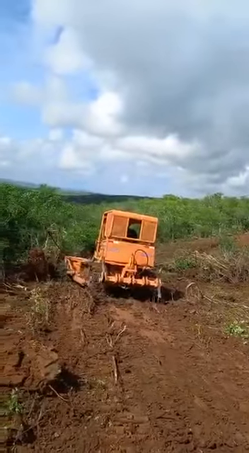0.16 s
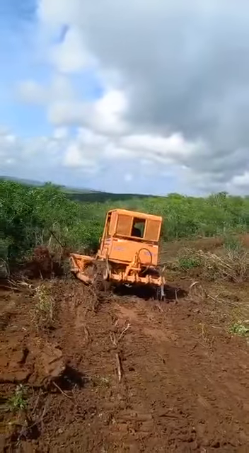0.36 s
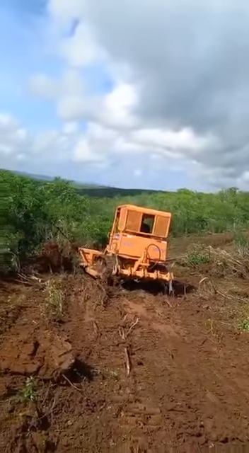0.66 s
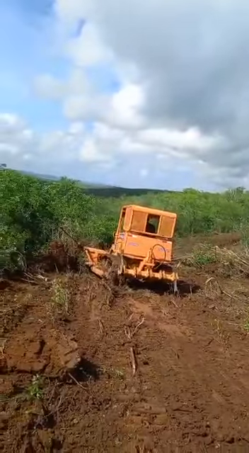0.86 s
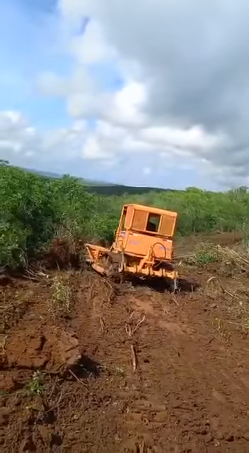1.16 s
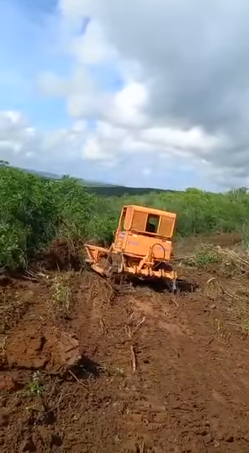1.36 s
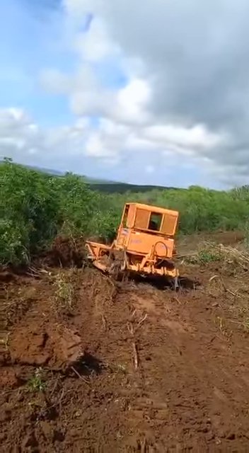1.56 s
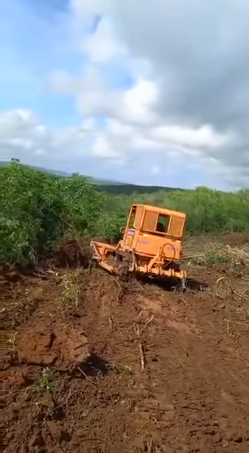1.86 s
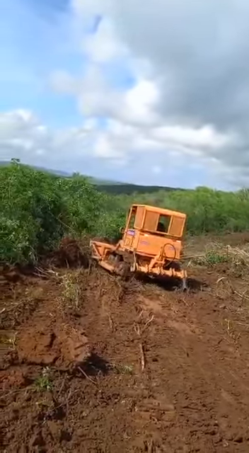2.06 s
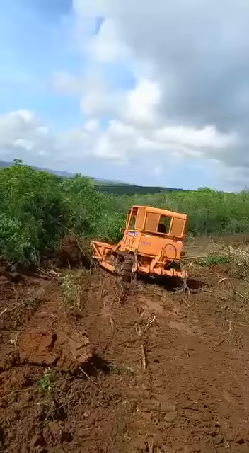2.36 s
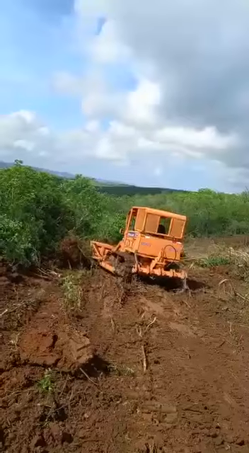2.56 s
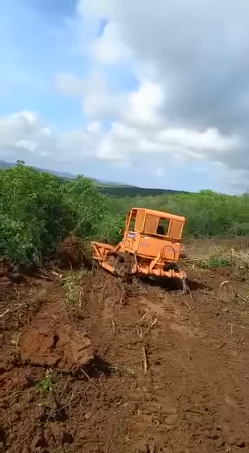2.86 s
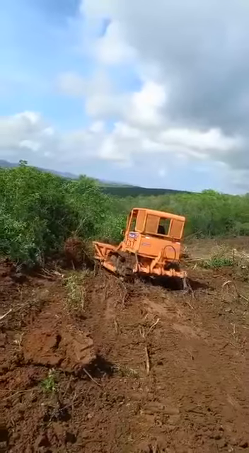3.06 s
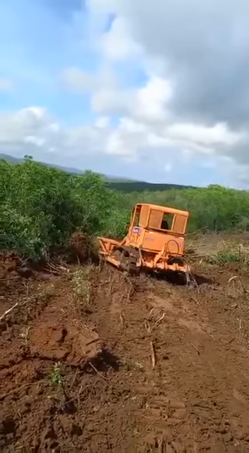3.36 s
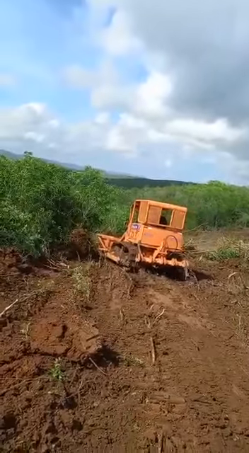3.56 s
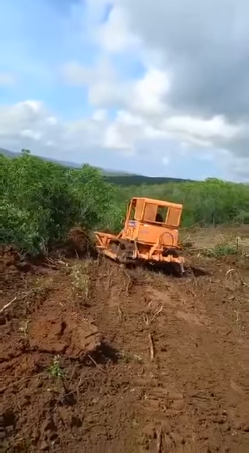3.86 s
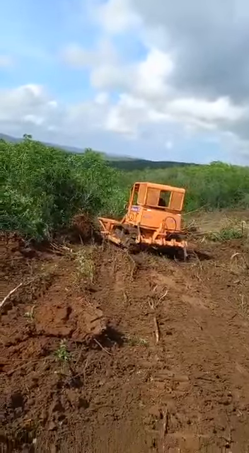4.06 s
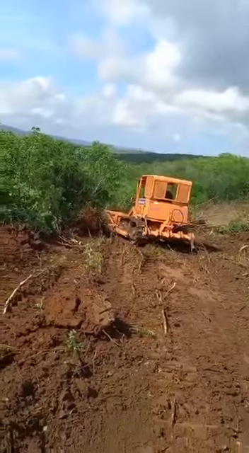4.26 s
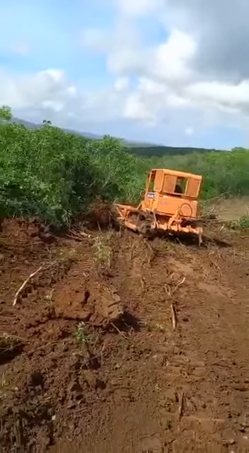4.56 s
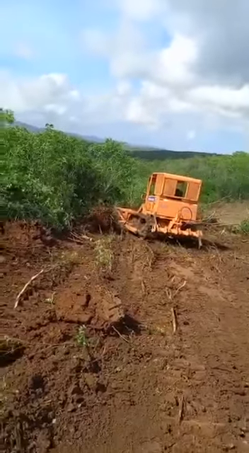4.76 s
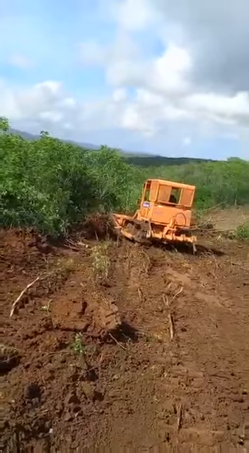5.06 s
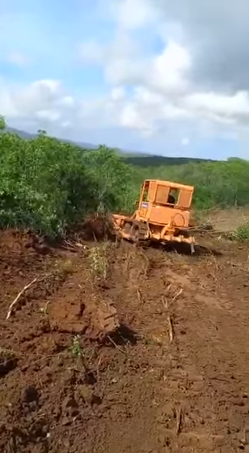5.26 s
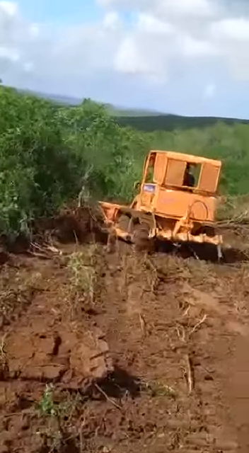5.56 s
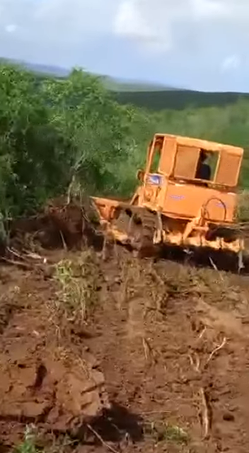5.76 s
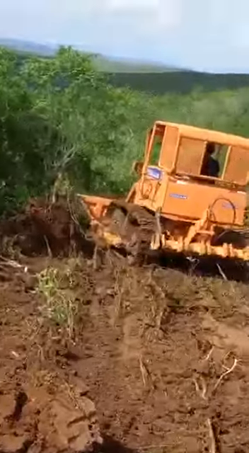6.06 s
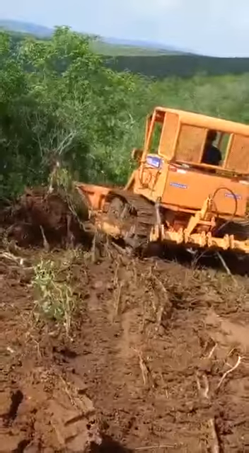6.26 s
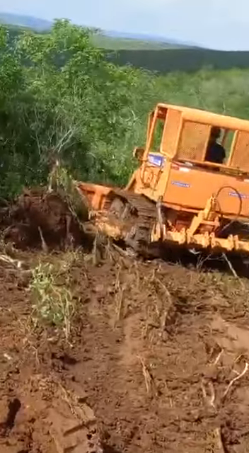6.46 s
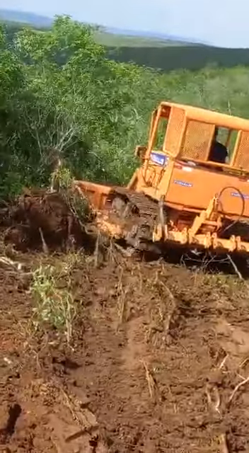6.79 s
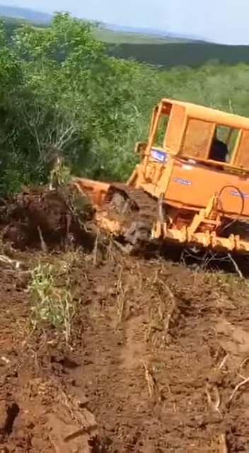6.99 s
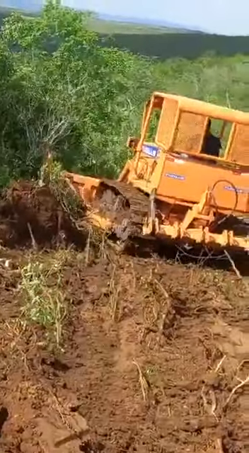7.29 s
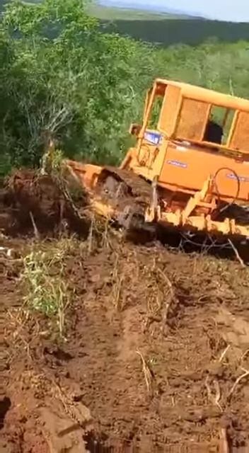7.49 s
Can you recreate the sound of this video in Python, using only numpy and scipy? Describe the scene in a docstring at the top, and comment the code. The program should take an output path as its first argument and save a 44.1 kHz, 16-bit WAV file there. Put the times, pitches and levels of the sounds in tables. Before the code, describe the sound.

Outdoors on open land, a six-cylinder diesel bulldozer runs continuously at a moderate distance. It first lugs, with deep exhaust drone, block knock, steel ticking, fine hiss, straining gear whine and dull churning earth. Around three seconds the load eases and the pitch rises slightly. Twigs snap near four seconds; a wind puff thumps the stereo handheld microphone just after five, followed by sharp cracks, panel buzz and faint stem crackle.

```python
"""A six-cylinder diesel crawler tractor pushes soil and brush across open land, heard at two microphone ports.
At first it lugs: exhaust orders drone over puffs of gas, the block clatters and knocks, thin steel ticks in a
fine hiss, gears whine under strain and earth churns off the blade. Near 3 s the load eases and the machine turns.
Near 4 s a light breeze freshens and twigs begin to snap; near 5.3 s a puff buffets the microphone, then on
rough ground panels buzz harder and crushed stems crackle, while bites of the blade still make the engine work."""
import sys
import numpy as np
from scipy import signal
from scipy.fft import rfft, irfft, next_fast_len
from scipy.io import wavfile
from scipy.ndimage import map_coordinates

SR = 44100
rng = np.random.default_rng(int(sys.argv[2]) if len(sys.argv) > 2 else 0)


def wav_out(sig):
    """Save sig, one row per channel (or a flat mono array), as 16-bit PCM at SR to the path in sys.argv[1]."""
    wavfile.write(sys.argv[1], SR, np.round(np.clip(np.atleast_2d(sig).T, -1, 1) * 32767).astype(np.int16))


N = 336483
TIME = np.arange(N) / SR
BINS = np.fft.rfftfreq(N, 1 / SR)  # Hz

# relative strength of each cylinder, one row a cylinder in firing order: knock_db, hiss_db
CYLINDERS = [(-7, -4.5), (-20, -10), (1, -3.5), (-7, -9), (-0.5, 0.5), (1, -4.5)]
CYLINDER_COUNT = len(CYLINDERS)
REFERENCE_HZ = 81.26  # reference firing rate, firings a second; the speed's shortfall below it measures the load
BITE_ATTACK_S, BITE_RELEASE_S = 0.075, 0.16  # softness of each edge
LURCHING = (5.4, 0.078)  # middle s, softness s: rough ground starts to shake the machine


def gain_of(db):
    """Level: decibels become an amplitude factor."""
    return 10 ** (np.asarray(db) / 20)


def evened(x):
    """Normalisation: scales to rms 1."""
    return x / np.sqrt(np.mean(x ** 2) + 1e-20)


def read(points, order=1):
    """Spectral envelope: one column of a frequency table, interpolated in log frequency at every bin."""
    table = np.transpose(points)
    return np.interp(np.log(BINS + 1), np.log(table[0] + 1), table[order])


def filtered(x, gain):
    """Linear filtering: multiplies the spectrum by a gain given at every bin."""
    size = next_fast_len(N, True)
    response = np.interp(np.fft.rfftfreq(size, 1 / SR), BINS, gain)
    return irfft(rfft(x, size) * response, size)[..., :N]


def drift(rate_hz):
    """Random modulation: chance values joined by straight lines, two per period of the rate, at rms 1."""
    steps = rng.standard_normal(4000)
    return evened(np.interp(TIME * rate_hz * 2, np.arange(len(steps)), steps))


def ramp(middle_s, softness_s):
    """Envelope: a smooth step from 0 to 1."""
    return .5 + .5 * np.tanh((TIME - middle_s) / (2 * softness_s))


def span(start_s, end_s, attack_s, release_s):
    """Envelope: rises softly at the start and falls softly at the end."""
    return ramp(start_s, attack_s) * (1 - ramp(end_s, release_s))


def crossfaded(before, after, share):
    """Linear mixing: goes from one value or sound to another as the share runs from 0 to 1."""
    return (1 - share) * before + share * after


def blend(lugging, free, ease):
    """Power addition: fades between two unrelated sounds at equal power."""
    return np.sqrt(1 - ease) * lugging + np.sqrt(ease) * free


def level(part, ease, bite):
    """Load dependence: dB between lugging and running free, plus a share of the dB for a full bite."""
    lugging_db, free_db, bite_db = part
    return crossfaded(lugging_db, free_db, ease) + bite_db * bite


def ringing(hz, width_hz):
    """Resonance: noise held in one narrow band."""
    return evened(filtered(rng.standard_normal(N), 1 / (1 + ((BINS - hz) / width_hz) ** 2)))


def port_noise(colour, order=1, source=None):
    """Coherence: mid and side noises mix so the ports agree in the bass and less in the treble."""
    # correlation of the two ports: frequency_hz, lugging_likeness, free_likeness
    likeness = [(30, .99, .98), (150, .985, .975), (260, .98, .95), (470, .96, .92), (650, .93, .96),
                (800, .7, .92), (1020, .62, .74), (1160, .88, .82), (1450, .45, .5), (1850, .25, .6),
                (2050, .62, .85), (2400, .3, .62), (2800, .62, .62), (3100, .45, .35), (3620, .9, .8),
                (4300, .3, .3), (5460, .25, .22), (8200, .2, .15), (12000, .25, .1)]
    a, b = rng.standard_normal((2, N)) if source is None else source
    same = np.clip(read(likeness, order), -1, 1)
    gain = gain_of(read(colour))
    mid = filtered(a, gain * np.sqrt((1 + same) / 2))
    side = filtered(b, gain * np.sqrt((1 - same) / 2))
    return evened(np.array([mid + side, mid - side]))


def firing_gate(cycle, cylinder_db, peak_at, steady, scatter_db):
    """Amplitude modulation: a burst per firing peaks at a share of the gap, with each cylinder's strength."""
    firing = cycle * CYLINDER_COUNT
    count, since = firing.astype(int), firing % 1
    scatter = scatter_db * rng.standard_normal(2000)[count]
    strength = gain_of(cylinder_db[count % CYLINDER_COUNT] + scatter)
    burst = since / peak_at * np.exp(1 - since / peak_at)
    return evened(np.sqrt(steady ** 2 + (strength * burst) ** 2))


def staggered(x, latest_s=.009, count=16):
    """Group delay: each band of the machine answers a blow with its own short delay."""
    log_hz = np.linspace(np.log(300), np.log(6000), count)
    delay_s = np.interp(np.log(BINS + 1), log_hz, latest_s * rng.random(count))
    return filtered(x, np.exp(-2j * np.pi * np.cumsum(delay_s) * BINS[1]))


def biting():
    """Load: how hard the blade digs, 0-1; each bite takes hold quickly and lets go more slowly."""
    # the blade bites into the soil and the whole machine works harder: start_s, end_s, strength (0-1)
    bites = [(-0.3, 0.55, 0.38), (1.62, 2.347, 0.38), (3.55, 4.3, 0), (4.8, 5.4, 0.55), (5.646, 6.1, 0.27),
             (7.15, 7.45, 0)]
    return sum(strength * span(start_s, end_s, BITE_ATTACK_S, BITE_RELEASE_S)
               for start_s, end_s, strength in bites)


def exhaust(cycle, sag_hz, ease, bite, waver_db=1.0):
    """Harmonic synthesis: the firing tone grows as the speed sags; uneven cylinders add weaker orders."""
    # exhaust tones: multiple (of the two-turn engine cycle), lugging_db, free_db
    orders = [(4, -42, -44), (7, -40, -44), (8, -42, -38), (9, -34.5, -32.3), (10, -39.5, -46),
              (11, -46, -39), (12, -38, -34), (13, -42, -48), (14, -47, -47), (15, -44, -45),
              (16, -40, -48), (18, -48, -45), (19, -48, -51), (20, -42.5, -42)]
    bite_db_per_octave = 3  # a full bite tilts the orders upward about the firing tone
    firing_db = -19.5 + 0.58 * sag_hz + 0.29 * drift(11)
    out = gain_of(firing_db) * np.cos(2 * np.pi * CYLINDER_COUNT * cycle)
    for multiple, lugging_db, free_db in orders:
        # overtones of the firing line up into a sharp crest; the others start anywhere
        start = rng.random() * (multiple % CYLINDER_COUNT > 0)
        level_db = crossfaded(lugging_db, free_db, ease) + waver_db * drift(2.6)
        level_db = level_db + bite_db_per_octave * bite * np.log2(multiple / CYLINDER_COUNT)
        wander = 0.08 * drift(4)  # radians
        out += gain_of(level_db) * np.cos(2 * np.pi * (multiple * cycle + start) + wander)
    return np.sqrt(2) * out


def boom(cycle, waver_db=0.5):
    """Order tone: a hum on the 17th engine order rises and falls, on the whole growing."""
    # level of the hum: time_s, level_db
    swell = [(0, -39), (1.0, -41), (1.45, -47), (1.9, -38.5), (3.0, -40), (3.5, -36.5), (4.5, -35),
             (5.1, -32.5), (5.65, -33), (6.35, -29.5), (6.9, -33), (7.63, -31.5)]
    level_db = np.interp(TIME, *np.transpose(swell)) + waver_db * drift(2)
    return np.sqrt(2) * gain_of(level_db) * np.cos(2 * np.pi * (17 * cycle + rng.random()))


def rumble(cycle, level_db):
    """Turbulence: gas noise leaves the stack in puffs."""
    # spectrum of the gas noise: frequency_hz, density_db (per Hz)
    gas_colour = [(15, -24), (30, -8), (50, -2), (100, -3.5), (150, -0.5), (210, -0.5), (265, -4),
                  (320, -9), (420, -25.5), (800, -60)]
    gate = firing_gate(cycle, np.transpose(CYLINDERS)[0], peak_at=.35, steady=.9, scatter_db=.4)
    return gain_of(level_db) * gate * port_noise(gas_colour)


def clatter(cycle, ease, level_db):
    """Impact noise: combustion knock rings the block, partly alike in every cycle and partly new each time."""
    # spectrum of the block while lugging: frequency_hz, density_db (per Hz)
    lugging_colour = [(200, -3), (310, -5.5), (440, -3.5), (490, -5.5), (560, -3), (670, -6), (790, 1),
                      (850, -2.5), (920, 4.5), (990, -5), (1130, -8.5), (1500, -8), (1870, -14.5),
                      (2350, -9.5), (2800, -7), (3230, -18.5), (3800, -15.5), (6000, -23.5)]
    # spectrum of the block while running free: frequency_hz, density_db (per Hz)
    free_colour = [(200, -43), (330, -9), (390, 0.5), (430, -5.5), (490, -8.5), (600, -3.5), (740, -1.5),
                   (820, 0.5), (880, 4.5), (940, -5.5), (1090, -4.5), (1280, -9.5), (1600, -7.5),
                   (1880, -13), (2500, -6), (2850, -8.5), (3230, -18), (3700, -16), (5500, -23)]
    repeated = [map_coordinates(pattern, [cycle % 1 * len(pattern)], order=1, mode="grid-wrap")
                for pattern in rng.standard_normal((2, 2048))]
    locked = gain_of(-4) * (BINS > 1130)  # the repeating part lies above the block's own tones

    def state(colour, order):
        """Superposition: fresh noise plus the cyclic pattern."""
        return port_noise(colour, order) + filtered(port_noise(colour, order, repeated), locked)

    noise = evened(blend(state(lugging_colour, 1), state(free_colour, 2), ease))
    gate = firing_gate(cycle, np.transpose(CYLINDERS)[0], peak_at=.2, steady=.95, scatter_db=1.2)
    return gain_of(level_db + 1.03 * drift(13)) * staggered(gate * noise)


def block(cycle, ease, level_db=0.4, scatter_rad=1.42, waver_db=2.5, slip_cycles=0.0013, count=7):
    """Periodic radiation: wavering orders of the block roughly line up into two knocks each cycle."""
    # tones of the block before the common level_db: multiple (of the engine cycle), lugging_db, free_db
    block_orders = [(21, -55, -54), (22, -53, -63), (23, -53, -61), (27, -64, -57), (28, -58, -59),
                    (29, -53, -53), (30, -61, -51), (31, -53, -64), (32, -53, -56), (33, -55, -68),
                    (34, -51, -62), (36, -53, -67), (37, -61, -59), (38, -51, -52), (45, -53, -66),
                    (46, -58, -59), (47, -57, -52), (49, -55, -48), (50, -58, -54), (51, -48, -47.5),
                    (52, -51, -59), (53, -52, -53), (54, -58, -45.5), (55, -60, -54), (56, -49, -48),
                    (57, -50, -56), (58, -56, -54), (59, -49, -51), (61, -64, -51), (62, -61, -58),
                    (63, -52, -53), (64, -57, -47), (65, -56, -52), (66, -52, -57), (67, -56, -53),
                    (68, -51, -61), (69, -54, -57), (72, -54, -60), (74, -59, -61), (78, -56, -58),
                    (82, -68, -59)]
    multiple, *levels_db = np.transpose(block_orders)
    order_hz = multiple * REFERENCE_HZ / CYLINDER_COUNT
    # low orders meet at 2.45 firings into the cycle, high ones at 4.65
    place = np.where(order_hz < (561 + 930) / 2, 2.45, 4.65) / CYLINDER_COUNT
    angles, out = np.linspace(0, 1, 2049), 0
    phase = scatter_rad * rng.standard_normal((len(multiple), 1))
    waves = np.cos(2 * np.pi * multiple[:, None] * (angles - place[:, None]) + phase)
    for k in range(count):  # each group of tones wavers on its own
        angle = (cycle + slip_cycles * drift(3)) % 1
        lugging, free = (np.interp(angle, angles, gain_of(db[k::count]) @ waves[k::count])
                         for db in levels_db)
        out += gain_of(level_db + waver_db * drift(2.5)) * crossfaded(lugging, free, ease)
    return np.sqrt(2) * out


def knocks(cycle, ease, jitter=0.057):
    """Impact: hard strokes, each at its own place in the cycle (jitter in firings), excite unsteady tones."""
    # knocks once a cycle: place_firings, frequency_hz, width_hz, lugging_db, free_db
    strokes = [(2.45, 561, 180, -47, -53), (4.65, 930, 101.8, -49.5, -54), (3.0, 1300, 339, -55, -52.5),
               (3.6, 720, 71.2, -51, -47), (5.95, 2500, 300, -53.5, -58), (2.5, 2550, 280, -52.5, -56.5),
               (0.54, 2850, 460, -53, -54.5)]
    rise_s, decay_s, scatter_db = 0.0008, 0.003, 1.5
    out, age, turns = 0, np.arange(1500) / SR, np.arange(int(cycle[-1]))
    stroke = np.minimum(age / rise_s, 1) * np.exp(-age / decay_s)
    for place, hz, width_hz, lugging_db, free_db in strokes:
        late, size = rng.standard_normal((len(turns), 2)).T
        moment = turns + (place + jitter * late) / CYLINDER_COUNT
        at = np.interp(moment, cycle, np.arange(N)).astype(int)
        blows = np.zeros(N)
        blows[at] = gain_of(scatter_db * np.minimum(size, 1))
        ring = np.cos(2 * np.pi * np.cumsum(hz + width_hz / 2 * drift(250)) / SR)
        struck = evened(signal.oaconvolve(blows, stroke)[:N] * ring)
        out += gain_of(crossfaded(lugging_db, free_db, ease)) * struck
    return out


def ticks(cycle, level_db, scatter_db=3, jitter=0.08):
    """Struck resonance: each piece of steel is hit once a firing, at its own moment and uneven strength."""
    # steel ticking with injectors and valves: frequency_hz, width_hz, t60_s, relative_db
    steel = [(2750, 100, 0.086, -7.5), (2730, 250, 0.019, -5.5), (4640, 77, 0.025, -9.5),
             (7120, 160, 0.075, -6.5), (9050, 320, 0.036, -5.5), (10450, 290, 0.013, -7),
             (11160, 170, 0.036, -2.5)]
    out, age = np.zeros((2, N)), np.arange(2500) / SR
    firings = np.arange(1, int(cycle[-1] * CYLINDER_COUNT) - 1)
    cylinder_db = np.transpose(CYLINDERS)[1][firings % CYLINDER_COUNT]
    for hz, width_hz, t60_s, db in steel:
        late, size = rng.standard_normal((len(firings), 2)).T
        moment = firings + 0.52 + 0.15 * rng.random() + jitter * late
        at = np.interp(moment, cycle * CYLINDER_COUNT, np.arange(N)).astype(int)
        blows = np.zeros(N)
        blows[at] = gain_of(.5 * cylinder_db + scatter_db * np.minimum(size, 2))
        decay = gain_of(-60 * age / t60_s) * np.minimum(age / 0.0025, 1)
        dying = signal.oaconvolve(blows, decay)[:N]
        shared = ringing(hz, width_hz) * (hz < SR / 10)  # the lowest rings partly reach both ports alike
        rings = np.array([shared + ringing(hz, width_hz), shared + ringing(hz, width_hz)])
        out += gain_of(db) * evened(dying * rings)
    return gain_of(level_db) * out


def hiss(cycle, turn, level_db, lag_cycles=0.089):
    """Gated noise: a thin sizzle follows each firing, uneven from cylinder to cylinder."""
    # spectrum of the sizzle before the turn: frequency_hz, density_db (per Hz)
    early_colour = [(2500, -42), (3700, 1), (4700, 3), (6300, 2.5), (7150, -18), (7800, -14), (8400, 5),
                    (9000, -6), (9900, 1), (11200, 5), (12000, 4.5)]
    # spectrum of the sizzle after the turn: frequency_hz, density_db (per Hz)
    late_colour = [(2500, -43), (3900, 8), (4350, 9.5), (5300, 11.5), (6300, 8), (6950, 14.5), (8050, -24),
                   (8800, -3), (9400, 7), (11300, 5.5), (12000, -3)]
    hiss_db = np.transpose(CYLINDERS)[1]
    gate = firing_gate(cycle - lag_cycles, hiss_db, peak_at=.13, steady=.6, scatter_db=1.3)
    sizzle = blend(port_noise(early_colour), port_noise(late_colour, order=2), turn)
    return gain_of(level_db + .5 * drift(11.0)) * staggered(gate * sizzle, latest_s=.005)


def rattle(ease, lurch_db=3.0, flutter_db=2.2):
    """Panel resonance: loose panels buzz in narrow bands, fluttering, harder on rough ground."""
    # loose panels before the lurch: frequency_hz, width_hz, lugging_db, free_db
    panels = [(1630, 82, -48, -54.5), (3626, 134, -52, -53.5)]
    shake_db = lurch_db * ramp(*LURCHING)
    out = 0
    for hz, width_hz, lugging_db, free_db in panels:
        level_db = crossfaded(lugging_db, free_db, ease) + shake_db + flutter_db * drift(14)
        out += ringing(hz, width_hz) * gain_of(level_db)
    return out


def gears(cycle, ease, waver_db=3.0):
    """Gear meshing: tones locked to the crankshaft drift with backlash and sing out under strain."""
    # gear tones: multiple (of the engine cycle), lugging_db, free_db, strain_db (added by full strain)
    meshes = [(40.15, -51, -55, 8.5), (60.15, -52, -49, 7), (70, -55, -61, 15.5), (71, -49, -61, 4),
              (73, -58, -66, 8), (76, -59, -55, 17.5), (80.15, -64, -54.5, 0), (100.3, -54, -59, 4.5)]
    # the heaviest pushes: start_s, end_s, strength (0-1)
    strains = [(-0.3, 0.6, 0.3), (1.7, 2.72, 1)]
    edge_s, out = 0.05, 0
    strain = sum(strength * span(start_s, end_s, edge_s, edge_s) for start_s, end_s, strength in strains)
    for multiple, *part in meshes:
        gain = gain_of(level(part, ease, strain) + waver_db * drift(1.12))
        backlash = 0.3 * drift(4)  # radians
        out += gain * np.cos(2 * np.pi * (multiple * cycle + rng.random()) + backlash)
    return np.sqrt(2) * out


def soil(lumpy_db=2.0):
    """Granular flow: earth rolls off the blade as a dull noise of lumpy level."""
    # earth rolling: start_s, end_s, level_db
    spills = [(-0.3, 0.8, -42), (1.45, 2.35, -44.5), (4.05, 5.35, -41)]
    # spectrum of the earth: frequency_hz, density_db (per Hz)
    soil_colour = [(150, -14), (320, -0.5), (430, -0.5), (560, -0.5), (720, -14), (1500, -40)]
    rolling = sum(gain_of(db) * span(start_s, end_s, BITE_ATTACK_S, BITE_RELEASE_S)
                  for start_s, end_s, db in spills)
    return rolling * gain_of(lumpy_db * drift(14)) * port_noise(soil_colour)


def brush(size=6000):
    """Fracture: a twig under the blade cracks sharply, then its fibres tear in a dying run of clicks."""
    # twigs snapping: start_s, level_db, decay_s, low_hz, high_hz
    snaps = [(4.074, -26.5, .0055, 1100, 1850), (4.159, -34, .005, 1000, 1700),
             (4.198, -34, .008, 1000, 1700), (4.4285, -39, .002, 5000, 11000),
             (4.4337, -30.5, .002, 3000, 8500), (5.3935, -28, .004, 2100, 3000),
             (5.415, -40, .003, 6500, 11000), (5.4235, -24.5, .0042, 2400, 5500),
             (5.4262, -32, .0014, 5500, 11500), (5.4505, -34, .003, 2200, 4500),
             (5.49, -39, .002, 6500, 11000), (5.9782, -36, .0015, 3500, 9000),
             (6.4087, -36, .0015, 3500, 9000), (7.1421, -35, .0015, 3000, 8000)]
    rise_s = 0.0007
    fibre_db, fibre_decay_s, fibres_per_s = -10, 0.018, 2000
    out, age = np.zeros((2, N)), np.arange(size) / SR
    for start_s, db, decay_s, low_hz, high_hz in snaps:
        edges_hz = [low_hz, min(high_hz, SR / 2 - 1)]
        band = signal.butter(2, edges_hz, "bandpass", fs=SR, output="sos")
        burst = rng.standard_normal(size) + rng.standard_normal((2, size))  # partly shared by the ports
        crack = evened(signal.sosfilt(band, burst))
        clicks = rng.standard_normal((2, size)) * (rng.random(size) < fibres_per_s / SR)
        fibres = evened(signal.sosfilt(band, clicks))
        snap = crack * np.exp(-age / decay_s)
        snap += gain_of(fibre_db) * fibres * np.exp(-age / fibre_decay_s)
        out[:, round(start_s * SR):][:, :size] += gain_of(db) * np.minimum(age / rise_s, 1) * snap
    return out


def crackle(level_db=-49.5, clicks_per_s=93, decay_s=0.0017, spread_db=1.5):
    """Random impulses: small stems give way under the tracks once the ground gets rough."""
    # spectrum of the clicks: frequency_hz, density_db (per Hz)
    stem_colour = [(1500, -23), (3000, -6), (4000, 6), (6500, -25), (8000, -23), (11000, -10)]
    sizes = gain_of(spread_db * np.minimum(rng.exponential(1, N), 2))
    breaks = (rng.random(N) < clicks_per_s / SR) * sizes
    dying = signal.oaconvolve(breaks, np.exp(-np.arange(600) / SR / decay_s))[:N]
    return gain_of(level_db) * ramp(*LURCHING) * evened(dying * port_noise(stem_colour))


def breeze(level_db=-52, rise_db=9, gusty_db=0.5):
    """Wind turbulence: soft noise, unrelated at the two ports, freshens halfway and gives one hard puff."""
    # spectrum of the wind: frequency_hz, density_db (per Hz)
    wind_colour = [(8, -14), (20, -14), (40, -4), (75, 0), (110, -4), (150, -12), (260, -12), (420, -26),
                   (1500, -55)]
    steady = gain_of(level_db + rise_db * ramp(4.2, .12) + gusty_db * drift(2.8))
    puff_s, puff_db, decay_s = 5.312, -20, 0.062
    puff = gain_of(puff_db) * ramp(puff_s, 0.0013) * np.exp(-abs(TIME - puff_s) / decay_s)
    wind = evened(filtered(rng.standard_normal((2, N)), gain_of(read(wind_colour))))
    return (steady + puff) * wind


def ports(x, ease):
    """Diffraction: the microphone's body shades and shifts the left port, differently as the load eases."""
    # level difference of the ports, left minus right: frequency_hz, lugging_db, free_db
    balance = [(100, 0, 0), (300, 0, -.5), (600, .3, 1), (760, 0, 0), (1000, -3, -2.5), (1300, .5, .5),
               (1520, -1.5, 1.3), (1850, -4.5, -1.5), (2080, -2, -3.5), (2450, -7.5, -8), (3000, -5.5, -6),
               (3300, -1.5, -.5), (3700, 0, -1.3), (4100, -6, -5), (4900, -9, -7.5), (6100, -5, -2),
               (7200, -8, -7), (8000, -2, -2), (8750, -7, -3), (9400, -9, -10), (11500, -16, -14)]
    # phase by which the left port leads: frequency_hz, lugging_rad, free_rad
    port_lead = [(550, 0, 0), (700, -.1, 0), (920, -.6, -.25), (1150, -.1, .1), (1450, -.65, -.5),
                 (1800, -1.3, -.1), (2050, -.3, 0), (2330, -1, -.2), (2750, -.15, .5), (3700, -.1, .1),
                 (5000, -.25, .5), (9000, 1, 1.6)]

    def heard(order):
        """Interaural cues: splits the level and phase differences between the ports."""
        lean = gain_of(read(balance, order))
        lead = np.exp(.5j * read(port_lead, order))
        left = filtered(x[0], lead * np.sqrt(2 / (1 + lean ** -2)))
        right = filtered(x[1], np.sqrt(2 / (1 + lean ** 2)) / lead)
        return np.array([left, right])

    return crossfaded(heard(order=1), heard(order=2), ease)


def scene():
    """Synchronism: one crankshaft drives every layer of the engine; load and bites set the levels."""
    # engine speed, sagging under load: time_s, firing_rate_hz
    speed_points = [(0.0, 78.85), (0.22, 78.31), (0.57, 79.71), (0.85, 79.13), (1.3, 80.34), (1.65, 79.62),
                    (2.0, 78.3), (2.5, 78.79), (3.05, 81.28), (3.7, 82.2), (4.45, 82.26), (5.55, 81.85),
                    (6.1, 81.01), (6.65, 82.4), (7.05, 80.95), (7.3, 81.88), (7.63, 81.97)]
    firing_hz = np.interp(TIME, *np.transpose(speed_points))
    cycle = np.cumsum(firing_hz) / SR / CYLINDER_COUNT  # two turns of the crankshaft
    ease = ramp(3.09, 0.24)  # from lugging to running free
    turn = ramp(3.02, 0.66)  # the machine swings round
    bite = biting()
    # each triple: dB while lugging, dB once free (or turned), dB added by a full bite
    drone = exhaust(cycle, REFERENCE_HZ - firing_hz, ease, bite) + boom(cycle)
    drone = drone + rumble(cycle, level((-34, -33, 5.4), ease, bite))
    metal = clatter(cycle, ease, level((-33.5, -34.5, 3.3), ease, bite))
    metal += block(cycle, ease) + knocks(cycle, ease) + rattle(ease)
    metal += ticks(cycle, level((-41.5, -55, 0.76), turn, bite))
    sizzle = hiss(cycle, turn, level((-39.5, -48, 0.7), ease, bite))
    machine = drone + metal + sizzle + gears(cycle, ease)
    return ports(machine + soil() + crackle(), ease) + brush() + breeze()


def record(dry):
    """Band limiting: a very short fade at each end, then a steep low-pass filter."""
    fade = np.minimum(np.minimum(TIME, TIME[::-1]) / .002, 1)
    low_pass = signal.firwin(511, 11900, window=("kaiser", 9), fs=SR)  # edge in Hz
    return signal.oaconvolve(dry * fade, low_pass[None], "same")


dry = scene()
out = record(dry)
wav_out(out)
```